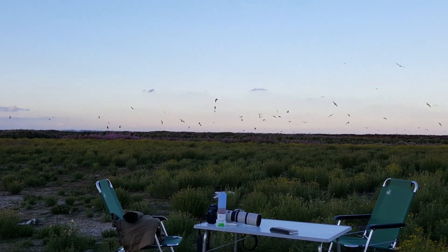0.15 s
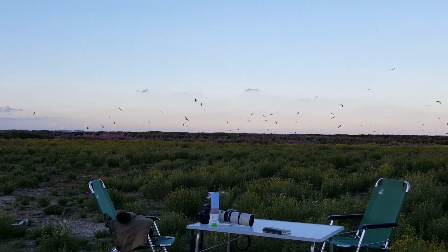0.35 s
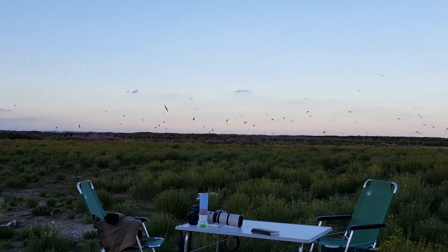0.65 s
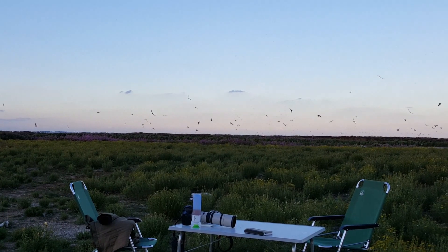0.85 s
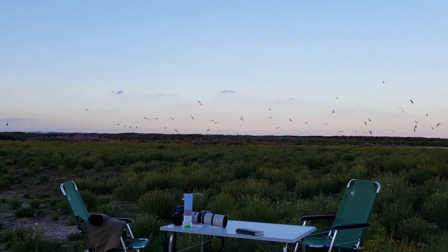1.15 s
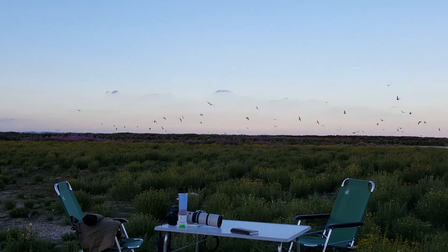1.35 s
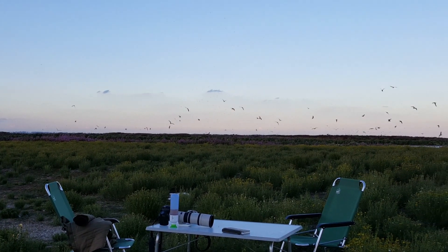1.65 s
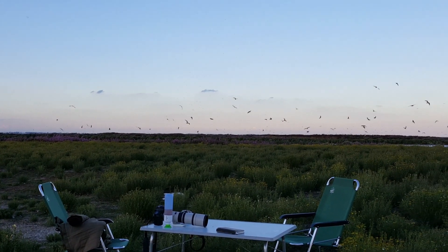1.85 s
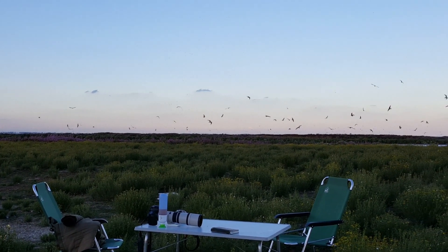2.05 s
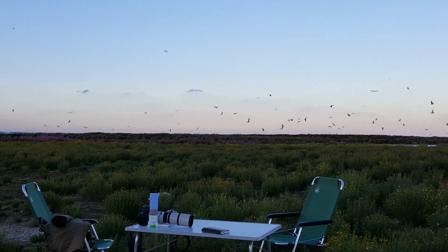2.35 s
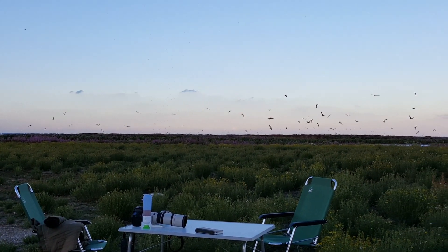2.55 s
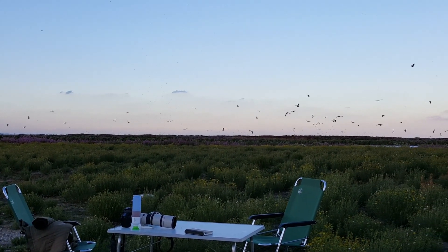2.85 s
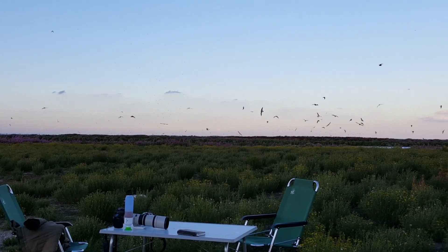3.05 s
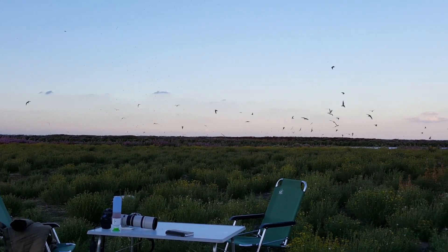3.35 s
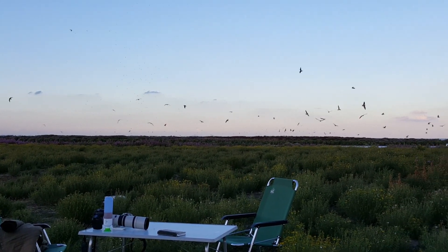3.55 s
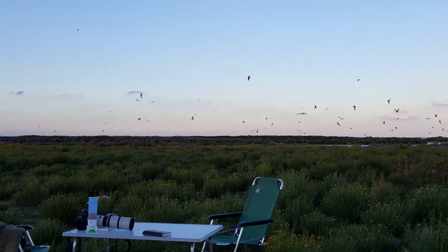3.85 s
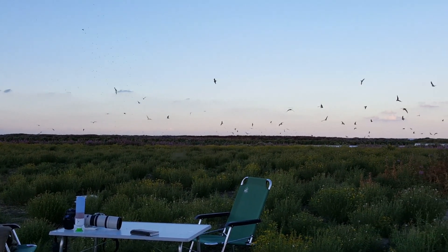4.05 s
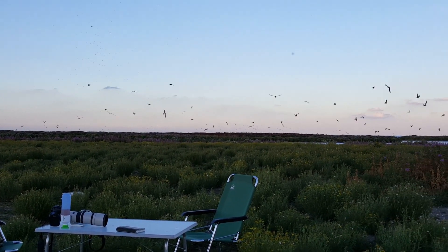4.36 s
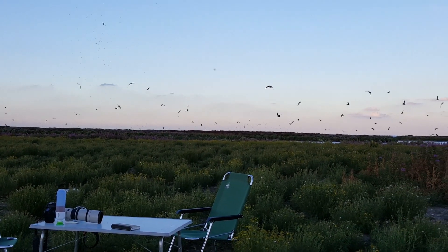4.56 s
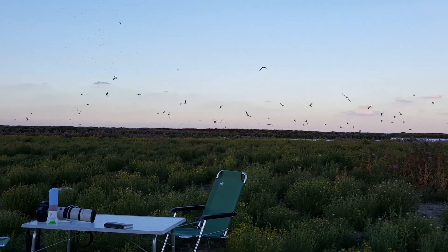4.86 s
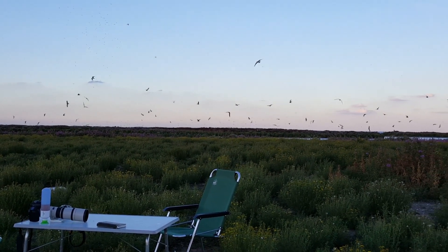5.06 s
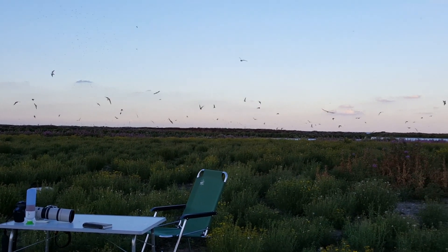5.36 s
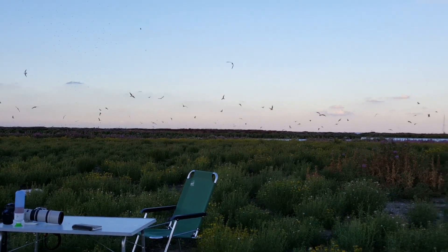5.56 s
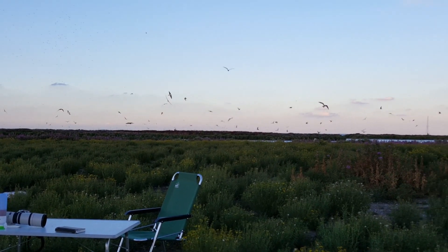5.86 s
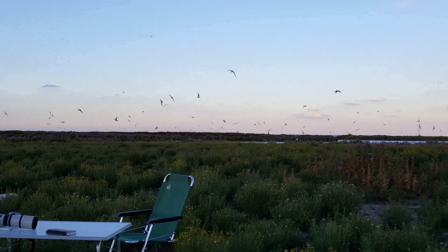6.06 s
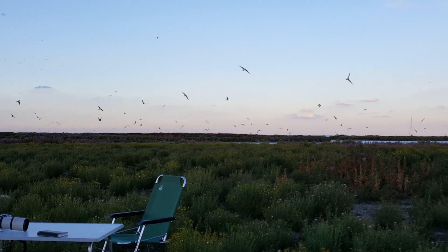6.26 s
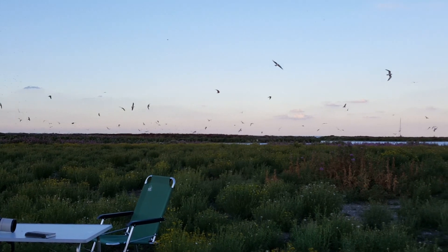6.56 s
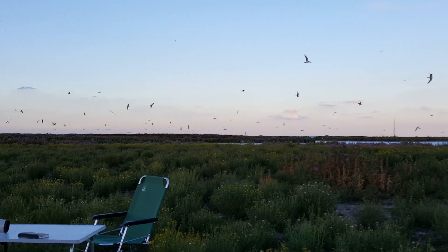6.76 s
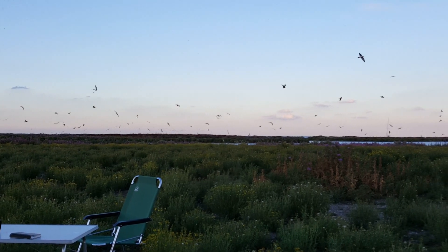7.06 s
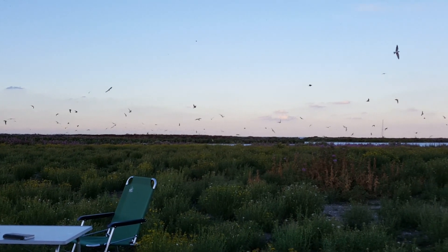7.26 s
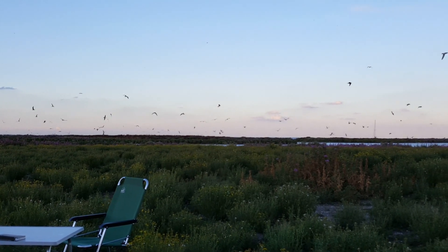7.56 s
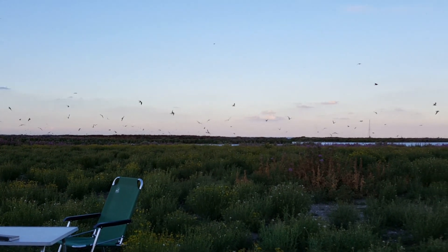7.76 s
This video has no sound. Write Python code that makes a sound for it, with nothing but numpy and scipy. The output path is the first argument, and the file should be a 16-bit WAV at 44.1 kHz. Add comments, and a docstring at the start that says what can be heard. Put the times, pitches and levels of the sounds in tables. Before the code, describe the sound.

Shrill tern cries and short yelps overlap across a marsh, with the far colony chattering behind them over a faint hiss of open air. Wind flutters on the hand-held microphone, then a nearby bird gives a trilling scream. A stronger gust thumps as another close cry turns into a clicking rattle. The wind eases for one more cry and rattle, then returns in low buffets while the flock keeps calling more softly.

```python
"""Shrill, trilling tern cries over an open marsh at dusk, most of the birds to the right.
Each cry is a harmonic tone from the syrinx, pulsing about 56 times a second; two of the closest
break up into a rasp of clicks that ring the throat. Short kips and the din of the far colony fill
the gaps, a small bird ticks, and gusts buffet the microphone ports of a hand-held phone."""
import sys
import numpy as np
from scipy import signal
from scipy.fft import rfft, irfft, next_fast_len
from scipy.io import wavfile

SR = 44100
rng = np.random.default_rng(int(sys.argv[2]) if len(sys.argv) > 2 else 0)


def transcribe(u):
    """Save the signal u as a 16-bit wav file named by the first command-line argument.

    u: samples, shape (n,) or (channels, n), limited to [-1, 1]; the rate is SR.
    q: integer samples, one column per channel.
    """
    v = np.clip(np.atleast_2d(u).T, -1, 1)
    q = np.round(v * 32767).astype(np.int16)
    wavfile.write(sys.argv[1], SR, q)


N = 348390
TIME = np.arange(N) / SR
FLOCK_LAG_MS = .345  # throughout, lag is how late the left ear is and pan is left minus right

# buffets of wind on the ports: peak t/s, length/s, level/dB, f/Hz, pan/dB
BUFFETS = [(.257, 0.026, -30, 151, 12), (.318, 0.028, -25.5, 170.3, 4.5), (0.349, 0.022, -32.5, 224.6, 5),
           (.645, 0.014, -33.5, 151.5, 12), (0.863, 0.047, -39.5, 114.8, 0), (1.463, 0.027, -38.5, 97.3, 1),
           (2.51, 0.019, -18.5, 207, 1), (2.533, 0.02, -20.5, 254.5, 0), (2.58, 0.023, -25, 218.5, 7),
           (2.599, 0.015, -17.5, 267, -6.5), (2.652, 0.01745, -26.5, 152.7, -2),
           (2.84, 0.048, -36, 127.6, -6), (2.915, 0.038, -33, 191.5, 14.5), (3.155, 0.022, -33, 127.5, -4),
           (3.245, 0.032, -29, 165, 1.5), (3.268, 0.019, -23.5, 182, 0), (3.315, 0.027, -32.5, 132, 3),
           (3.488, 0.037, -37.5, 130.6, -2), (4.881, 0.023, -41, 97, 15), (4.998, 0.077, -34.5, 104.8, 0),
           (5.088, 0.044, -27.5, 165.6, 3), (5.162, 0.039, -34, 192.8, 13.5), (5.234, 0.042, -33.5, 197, 7),
           (5.473, 0.03, -37, 158, 18), (5.735, 0.025, -32, 166.6, 3), (5.79, 0.032, -33, 188.3, -6),
           (5.928, .025, -34.5, 192.5, 10), (6.112, 0.044, -27, 198.8, -0.5), (6.276, 0.035, -19, 232, 4.5),
           (6.339, 0.032, -24, 190.8, -5), (6.38, 0.022, -28, 298, -4), (6.446, 0.043, -24.5, 224, 1.5),
           (6.597, 0.027, -28.5, 164, -4), (6.657, 0.018, -31, 255, 9), (6.779, 0.024, -28.5, 251.8, 6),
           (6.819, 0.038, -26, 239.6, -4.5), (6.86, 0.023, -26.5, 280.3, 0),
           (7.026, 0.032, -27, 222.5, 5.5), (7.167, 0.026, -28.5, 238, 10.5),
           (7.275, 0.026, -29, 220.4, -1.5)]


def close_terns():
    """The nearest birds: cries and rasps, with a quick ground return and a faint tail from the shrubs."""
    calls = close_cries() + close_rasps()
    ground = undb(-9) * scatter(calls, t60=.03, onset_s=.001)
    shrubs = undb(-16) * scatter(calls, t60=.55, onset_s=.03)
    return calls + ground + shrubs


def close_cries():
    """Each cry scoops up to pitch, sags and dulls while held, then breaks downward and dies away."""
    # t/s, break t/s, f/Hz, sag/(Hz/s), level/dB, lift of harmonics 1, 3 and 4/dB, top treble/dB,
    # hoarseness/dB, trill depth/0-1, pan/dB, lag/ms
    cries = [(0.8, 1.061, 1739, 545.7, -38, -1.5, 1.5, 1, -6.5, -50, .45, -6, .09),
             (2.458, 2.914, 1572, 69.8, -39.5, -2.5, -1.5, -3, -0.5, -16.5, 0.58, 2.5, -.18),
             (4.29, 4.698, 1603, 169.9, -38.5, 0.5, -0.5, -4.5, -4, -35, .82, 4, .03)]
    # scrape of air in each trill beat: f/Hz, level/dB
    scrape = [(2000, -27.5), (4000, 2), (5000, 0), (6500, -20), (7500, -9), (12500, -16), (14500, -24)]
    # hoarse air under the cry: f/Hz, level/dB
    hoarse = [(250, -10), (550, 6), (1000, -1.5), (1400, -6), (2200, -23)]
    # shelf for the top treble: f/Hz, share/0-1
    top_shelf = [(6500, 0), (9000, 1)]
    attack_s, scoop_s, strain_s, break_s, tail_s = .011, .028, .028, .02, .085
    out = np.zeros((2, N))
    for (start, break_at, top_hz, sag, db, first_db, third_db, fourth_db,
         top_db, hoarse_db, trill, pan_db, lag_ms) in cries:
        hold = break_at - start
        t = np.arange(int((hold + tail_s) * SR)) / SR
        broken = 1 - np.exp(-np.maximum(t - hold, 0) / break_s)
        strain = np.exp(-((t - hold) / strain_s) ** 2)  # harsher and a touch quieter around the break
        scoop = 1 - .09 * np.exp(-t / scoop_s)
        hz = (top_hz - sag * t) * scoop * (1 - .31 * broken)
        dull_db = 10 * t
        lead = syrinx(hz, third_db - dull_db, fourth_db - dull_db, trill, rough=.24 + .55 * strain,
                      first_db=first_db, airs=[(scrape, -25), (hoarse, hoarse_db)])
        scream = colour(lead + second_voice(hz), top_shelf, top_db)
        level = undb(db - 11 * broken - 2 * trill * strain)
        edges = np.minimum(t / attack_s, 1) * fade(len(t), .0025)
        add(out, scream * level * edges, start, pan_db, lag_ms)
    return out


def syrinx(hz, third_db, fourth_db, trill, rough, first_db=0, airs=(), harmonics=8):
    """A tern's voice: each trill beat swells and slides down; an open beak lifts harmonics 3 and 4."""
    # resonance of the throat: f/Hz, gain/dB
    throat = [(700, -50), (1100, -13), (1600, -17), (2300, -7), (3200, -2), (3900, -15), (4800, -16),
              (6300, -20.5), (7200, -35), (8300, -31), (11000, -35), (12700, -35), (15000, -53)]
    n = len(hz)
    beat = trill_phase(n)
    opening = (.5 - .5 * np.cos(2 * np.pi * beat ** .85)) ** 1.18  # crests early in the beat
    pulsing = unit((1 - trill + trill * opening) * undb(1.3 * walk(n, 79.3)))
    # the pitch is least steady between beats, when the membranes are slack
    jitter = rough * .045 * walk(n, 900) * (1.5 - opening)
    drift = (.004 + .007 * trill) * walk(n, 90)
    slide = .11 * trill * (.4 - beat)
    phase = 2 * np.pi * np.cumsum(hz * (1 + slide + jitter + drift)) / SR
    lift_db = {1: first_db, 3: third_db, 4: fourth_db}
    tone = 0
    for k in range(1, harmonics + 1):
        db = spectrum_db(throat, k * hz) + lift_db.get(k, 0) + 4 * rough * walk(n, 248.6)
        tone += undb(db) * np.sin(k * phase)
    breath = .7 * rough * unit(colour(rng.standard_normal(n), throat))
    for spectrum, air_db in airs:
        breath += undb(air_db) * unit(colour(rng.standard_normal(n), spectrum))
    grit = 1 + .35 * rough * walk(n, 1100)
    return pulsing * (np.sqrt(2) * tone * grit + breath)


def second_voice(hz):
    """The other side of the syrinx adds a dull lower tone, which makes the cry harsh."""
    sinking_hz = hz.max() * np.linspace(.85, .77, len(hz))
    return undb(-16) * syrinx(sinking_hz, 0, 0, trill=.6, rough=.7, harmonics=2)


def trill_phase(n, trill_hz=56.08):
    """Place within the trill beat, 0-1; the rate wanders a little."""
    return np.cumsum(trill_hz * (1 + .04 * walk(n, 20)) / SR) % 1


def close_rasps():
    """Rattling clicks: two rasps that end close cries, and one further off."""
    # t/s, length/s, level/dB, fading/(dB/s), release/s, treble/dB, trill depth/0-1,
    # irregularity/0-1, throat tuning/ratio, pan/dB, lag/ms
    rasps = [(2.915, 0.43, -39, -6, 0.037, -0.5, 0.2, 0.54, 0.94, 2.5, -0.16),
             (4.717, 0.55, -40.5, 2.5, 0.26, -1, .8, 0.29, 0.99, 3, 0.072),
             (7.527, 0.56, -52.5, 8, 0.074, -15, 0.5, .5, 0.937, -5, 0.46)]
    # shelf for the treble: f/Hz, share/0-1
    treble_shelf = [(3400, 0), (4500, 1)]
    attack_s, release_db = .02, -3.5
    lowpass = signal.butter(2, 12500, fs=SR, output="sos")
    out = np.zeros((2, N))
    for start, length, db, fading, release, treble_db, trill, irregular, tuning, pan_db, lag_ms in rasps:
        t = np.arange(int(length * SR)) / SR
        rattle = signal.sosfilt(lowpass, rasp(len(t), trill, irregular, tuning))
        rattle = unit(colour(rattle, treble_shelf, treble_db))
        dying_db = release_db * np.clip(1 - (length - t) / release, 0, 1)
        envelope = undb(db - fading * t + dying_db) * np.minimum(t / attack_s, 1)
        add(out, rattle * envelope, start, pan_db, lag_ms)
    return out


def rasp(n, trill, irregular, tuning, click_hz=225):
    """The voice slows to separate clicks, a few to a trill beat, that ring the throat."""
    # throat resonances before tuning: f/Hz, width/Hz, level/dB
    modes = [(1000, 450, -14), (1556, 300, -16), (2350, 900, -13), (2950, 620, 1), (3360, 480, 5),
             (4400, 2200, -19), (6000, 1300, -27), (9000, 5500, -34)]
    cycles = np.cumsum(click_hz * np.exp(irregular * walk(n, 300)) / SR)
    clicks = np.diff(np.floor(cycles), prepend=0) * undb(2.3 * walk(n, 300))
    gaps = trill_phase(n) > np.linspace(.85, .5, n)  # widening towards the end
    clicks *= 1 - trill * gaps
    clicks += .008 * rng.standard_normal(n)  # breath between the clicks
    ring = 0
    for k, (hz, width, db) in enumerate(modes):
        b, a = signal.iirpeak(hz * tuning, hz / width, fs=SR)
        ring += (-1) ** k * undb(db) * signal.lfilter(b, a, signal.lfilter(b, a, clicks))
    return unit(ring) * fade(n, .036)


def wheeling_terns():
    """Cries and kips from birds over the marsh; the ground answers at once, the shrubs later."""
    # t/s, length/s, top f/Hz, arch depth/ratio, level/dB, lift of harmonics 3 and 4/dB, trill depth/0-1
    cries = [(0, 0.17, 1613, 1.6, -44.5, 3.5, 4.5, 0.53), (0.182, 0.19, 1613, 1.2, -51, 1, 7.5, 0.55),
             (0.547, 0.28, 1740, 0.58, -58, 4, 9, 0.17), (1.184, 0.14, 1595, 1, -47.5, 6, 7, 0.46),
             (1.15, 0.37, 1748, 0.47, -46, -6, 3, 0.6), (1.484, 0.255, 1733, 1.58, -39, -2, 1.5, 0.4),
             (2.096, 0.084, 1586, 2.5, -55.5, 5, 3, .1), (2.185, 0.17, 1504, 1.45, -53.5, -6, 1, 0.13),
             (2.44, .32, 1670, 0.71, -49.5, 11.5, 6, 0.49),
             (3.078, 0.24, 1534, 0.59, -46.5, -11, -1.5, 0.85), (3.547, 0.22, 1548, 1.12, -48.5, 3, 1, 0.5),
             (4.037, 0.099, 1538, 1.75, -46, -4, 0, 0.77), (4.418, 0.14, 1590, 0.97, -47.5, 10.5, 6, 0.39),
             (4.523, 0.13, 1665, 1.4, -50.5, 12.5, 13, 0.55),
             (5.237, 0.17, 1510, 0.25, -62.5, 17.5, 17, 0.2), (5.525, 0.33, 1690, 1.3, -57.5, 14, 9, 0.5),
             (5.939, 0.098, 1627, 2.25, -54.5, 7.5, 3, 0.5), (6.332, 0.11, 1734, 1.04, -55, 7, 13, 0.18),
             (6.408, 0.11, 1736, 0.96, -57, -10.5, -8, 0.06), (6.71, 0.18, 1674, 1.54, -60, 18, 15.5, 0.02),
             (6.889, 0.1, 1602, 2, -62.5, 21.5, 14, 0.08), (6.96, 0.13, 1357, 1.6, -54, -6, -4, 0.35),
             (7.07, 0.26, 1888, 1.4, -56.5, 12.5, 10, 0.73), (7.134, 0.17, 1511, 1.3, -62, 20, 14, 0.15)]
    # t/s, top f/Hz, level/dB
    kips = [(0.129, 1776, -45), (.605, 1715, -43.5), (0.757, 1580, -51.5), (1.289, 1752, -42),
            (1.775, 1598, -47.5), (1.996, 1622, -53.5), (2.894, 1650, -68), (3.284, 1620, -47),
            (3.362, 1684, -66), (3.474, 1545, -51.5), (3.672, 1612, -52), (3.775, 1610, -58),
            (3.844, 1600, -51.5), (4.125, 1656, -51), (4.19, 1690, -73), (4.242, 1630, -48.5),
            (5.874, 1880, -55), (6.535, 1540, -62), (7.066, 1634, -55.5), (7.46, 1700, -53),
            (7.788, 1916, -46.5)]
    pan_db, kip_s, full_kip_db = -4.5, .0544, -41
    calls = np.zeros((2, N))
    for start, length, top_hz, arch, db, third_db, fourth_db, trill in cries:
        call = cry(length, top_hz, third_db, fourth_db, trill, rough=.2 + .2 * trill, arch=arch)
        add(calls, undb(db) * call, start, pan_db, FLOCK_LAG_MS)
    for start, top_hz, db in kips:
        upper_db = .54 * (full_kip_db - db)  # a weaker kip is thinner, with more upper harmonics
        add(calls, undb(db) * kip(kip_s, top_hz, upper_db), start, pan_db, FLOCK_LAG_MS)
    ground = undb(-4) * scatter(calls, t60=.025, onset_s=.001)
    shrubs = undb(-11) * scatter(calls, t60=.5, onset_s=.02)
    return calls + ground + shrubs


def cry(length, top_hz, third_db, fourth_db, trill, rough, arch, harmonics=6):
    """The pitch rises to a crest, then falls, further in a longer cry; arch deepens both."""
    n = int(length * SR)
    progress, crest = np.linspace(0, 1, n), .3546
    rise = .03466 * (1 - progress / crest) ** 2
    fall = .4 * length * ((progress - crest) / (1 - crest)) ** 2
    hz = top_hz * (1 - arch * np.where(progress < crest, rise, fall))
    swell = fade(n, .0044) * undb(-7 * (2 * progress - .8) ** 2)
    return swell * syrinx(hz, third_db, fourth_db, trill, rough, harmonics=harmonics)


def kip(length, top_hz, upper_db, rough=.14):
    """One short arch of pitch that falls further than it rose."""
    n = int(length * SR)
    hz = top_hz * (1 - .125 * (2 * np.linspace(0, 1, n) - .9) ** 2)
    return syrinx(hz, upper_db, upper_db, trill=.1, rough=rough, harmonics=5) * fade(n, .012)


def far_colony(count=240):
    """Hundreds of far kips, harsh cries and rasps merge into a din."""
    # swell of the din: t/s, level/dB
    swell = [(0, -48.5), (1.1, -49), (1.5, -42.5), (1.95, -50.5), (2.8, -46), (3.45, -51), (4.7, -43.5),
             (5.4, -53.5), (5.9, -52), (6.3, -55), (7.4, -53), (7.9, -50)]
    # tone of the far calls: f/Hz, gain/dB
    far_colour = [(600, -22), (1000, 7), (1600, 6.5), (2400, 5.5), (3200, -4.5), (4000, 9.5), (4800, 2),
                  (6300, -0.5), (7500, -1.5), (12000, 6)]
    spread_db, lead_in_s = 4, .3
    calls = np.zeros((2, N))
    for k, (when, kind, pitch, size, trill, bearing) in enumerate(rng.random((count, 6))):
        top_hz, upper_db = 1340 + 450 * pitch, 1.2 * rng.standard_normal()
        if kind < .55:
            call = kip(.045 + .06 * kind, top_hz, upper_db, rough=.15 + .3 * trill)
        elif kind < .88:
            call = cry(.2 * kind, top_hz, upper_db, upper_db, trill,
                       rough=.2 + .35 * trill, arch=1.8, harmonics=5)
        else:
            call = undb(-6) * rasp(int(.18 * SR), trill, irregular=.5, tuning=.82 + .22 * pitch)
        start = (k + when) / count * (N / SR + lead_in_s) - lead_in_s
        lag_ms = FLOCK_LAG_MS * (1.15 - (1 - bearing) ** 2)
        add(calls, undb(spread_db * size) * call, start, pan_db=-5 * bearing, lag_ms=lag_ms)
    din = colour(calls + undb(-8) * scatter(calls, t60=.27, onset_s=.0047), far_colour)
    return unit(din) * undb(np.interp(TIME, *np.transpose(swell)))


def small_bird():
    """Dry high ticks in quick runs, each a short tone with a scratchy, jittering pitch."""
    # t/s, centre f/Hz, level/dB
    ticks = [(0.227, 6550, -52.5), (0.248, 6500, -56), (.272, 7160, -68), (0.38, 4690, -52),
             (0.412, 4430, -51.5), (7.668, 7000, -62), (7.688, 7340, -64), (7.712, 7600, -79)]
    out, n = np.zeros((2, N)), int(.027 * SR)
    for start, hz, db in ticks:
        scratch_hz = hz + 900 * walk(n, 1800)
        tick = np.sin(2 * np.pi * np.cumsum(scratch_hz) / SR) * fade(n, .0017)
        add(out, undb(db) * unit(tick), start, pan_db=-4, lag_ms=FLOCK_LAG_MS)
    return out


def wind():
    """Eddies rumble at each port: a stronger gust makes them louder and quicker."""
    # strength of the steady wind: t/s, level/dB
    gusts = [(0, -52), (.48, -42.5), (.99, -57), (1.85, -62.5), (2.3, -54.5), (2.57, -36.5), (2.78, -46.5),
             (3.21, -49), (3.69, -66), (4.8, -63.5), (5.1, -40.5), (5.37, -53.5), (5.6, -42), (6.03, -48),
             (6.42, -42.5), (6.8, -38.5), (7.2, -47), (7.44, -59), (7.9, -61.5)]
    # spectrum of the eddies at speed 1: f/Hz, level/dB
    eddies = [(20, -50), (45, -14.5), (80, -0.5), (160, 3), (260, -3), (400, -15.5), (600, -21),
              (1000, -48.5), (2000, -37)]
    lift_db, pan_db = 2.5, 4
    gust_db = np.interp(TIME, *np.transpose(gusts))
    centres_hz = 25 * 2 ** np.arange(0, 6.5, .5)
    size = next_fast_len(N)
    octave = np.log2(np.maximum(np.arange(size // 2 + 1) * SR / size, 1))
    out, flutter = np.zeros((2, N)), walk(N, 28)
    for ear, side in enumerate((1, -1)):
        steady_power = undb(gust_db + lift_db + side * pan_db / 2) ** 2
        db = 10 * np.log10(steady_power + swirls(side)) + 1.8 * flutter + 2.2 * walk(N, 70)
        speed = 2 ** ((np.minimum(db, -29) + 34) / 28)  # the eddies quicken only up to a point
        noise, power = rfft(rng.standard_normal(size)), 0
        for hz in centres_hz:
            window = np.cos(np.pi * np.clip(octave - np.log2(hz), -.5, .5)) ** 2
            gain = undb(spectrum_db(eddies, hz / speed))
            out[ear] += gain * irfft(noise * window, size)[:N]
            power += gain ** 2 * hz * np.log(2) / SR
        out[ear] *= undb(db) / np.sqrt(power)
    return out


def swirls(side, trim_db=-9.5):
    """Power of the eddies that the buffets stir up at one port."""
    power = 0
    for peak, length, db, _, pan_db in BUFFETS:
        swell = 1 / (1 + (2 * (TIME - peak) / length) ** 2)
        power += (undb(db + trim_db + side * pan_db / 2) * swell) ** 2
    return power


def thumps(trim_db=-2.5, wobble=.33):
    """Low thumps: a buffet shakes the air in each port separately for a few uneven cycles."""
    out = np.zeros((2, N))
    for peak, length, db, hz, pan_db in BUFFETS:
        near = np.abs(TIME - peak) < 2 * length
        t = TIME[near] - peak
        swell = undb(db + trim_db) * np.exp(-2 * (t / length) ** 2)
        for ear, side in enumerate((1, -1)):
            cycles = np.cumsum(hz * np.exp(wobble * walk(len(t), 260))) / SR + rng.random()
            out[ear, near] += undb(side * pan_db / 2) * swell * np.sin(2 * np.pi * cycles)
    return out


def flapping():
    """The air at the ports sheds two quick runs of soft pops."""
    # t/s, peak in the louder ear/dB, pan/dB
    pops = [(.448, -41, 15), (0.476, -33.5, 18), (.495, -27, 20), (.512, -31, 20), (.545, -30, 18),
            (.56, -42, 20), (0.581, -44, 20), (.607, -34, 20), (0.628, -35, 20), (.659, -40, 20),
            (2.223, -46, 0), (2.237, -44, -3), (2.26, -44, -3), (2.273, -48, 0), (2.285, -43, -4),
            (2.302, -44, -3)]
    bandpass = signal.butter(3, [171, 855], "band", fs=SR, output="sos")
    out, t = np.zeros((2, N)), np.arange(int(.03 * SR)) / SR
    for start, db, pan_db in pops:
        puff = np.exp(-t / .0004) + .15 * rng.standard_normal(len(t)) * np.exp(-t / .006)
        pop = signal.sosfilt(bandpass, puff)
        add(out, undb(db - abs(pan_db) / 2) * pop / np.abs(pop).max(), start, pan_db, 0)
    return out


def open_air():
    """A faint, steady bed of hiss and rumble."""
    # f/Hz, level/dB
    air = [(30, 5.5), (100, 3.5), (250, -9), (600, -9.5), (1200, -9.5), (3000, -4), (6000, -16),
           (7500, -31.5), (11000, -31), (15000, -28.5)]
    return undb(-53.5) * unit(colour(rng.standard_normal((2, N)), air))


def scatter(x, t60, onset_s):
    """Diffuse returns from shrubs and ground, different at each ear."""
    t = np.arange(SR // 2) / SR
    tails = rng.standard_normal((2, len(t))) * undb(-60 * t / t60) * (1 - np.exp(-t / onset_s))
    tails /= np.sqrt(np.sum(tails ** 2, axis=1, keepdims=True))
    return signal.fftconvolve(x, tails, axes=1)[:, :N]


def undb(db):
    """Decibels to gain."""
    return 10 ** (np.asarray(db) / 20)


def unit(x):
    """Scale to rms 1."""
    return x / np.sqrt(np.mean(x ** 2) + 1e-18)


def spectrum_db(points, hz):
    """Read a spectrum on a log-frequency axis."""
    f, db = np.transpose(points)
    return np.interp(np.log(np.maximum(hz, 1)), np.log(f), db)


def colour(x, points, amount=1):
    """Equalise: the curve times amount is the gain in decibels."""
    n = next_fast_len(x.shape[-1])
    gain = undb(amount * spectrum_db(points, np.arange(n // 2 + 1) * SR / n))
    return irfft(rfft(x, n) * gain, n)[..., :x.shape[-1]]


def walk(n, rate):
    """Random levels, rate a second, joined by lines; spread near 1."""
    at = np.arange(n) * rate / SR + rng.random()
    knots = rng.standard_normal(int(n * rate / SR) + 3)
    return np.interp(at, np.arange(len(knots)), knots) * np.sqrt(3 / 2)


def fade(n, edge_s):
    """Soft start and end."""
    i = np.arange(n)
    return np.sin(np.pi / 2 * np.minimum(np.minimum(i, n - 1 - i) / (edge_s * SR), 1)) ** 2


def add(out, x, start, pan_db, lag_ms):
    """Mix a sound into both ears with a level and a time difference."""
    for ear, side in enumerate((1, -1)):
        i = int((start + side * lag_ms / 2e3) * SR)
        a, b = max(i, 0), min(i + len(x), N)
        if b > a:
            out[ear, a:b] += undb(side * pan_db / 2) * x[a - i:b - i]


def scene():
    """Birds coloured by the two ports, over wind and open air."""
    # tone contrast between the ports, mostly applied to the right: f/Hz, pan/dB
    port_balance = [(700, -5), (1500, 1.5), (3200, -2), (4800, -7.5), (6400, -5.5), (7500, -8.5),
                    (9000, 25), (15000, 4)]
    left, right = close_terns() + wheeling_terns() + far_colony() + small_bird()
    birds = np.array([colour(left, port_balance, .17), colour(right, port_balance, -.85)])
    return birds + open_air() + wind() + thumps() + flapping()


def record(dry):
    """The phone cuts the top steeply above 15.7 kHz."""
    return signal.sosfilt(signal.ellip(10, .2, 70, 15700, fs=SR, output="sos"), dry)


dry = scene()
out = record(dry)
transcribe(out)
```